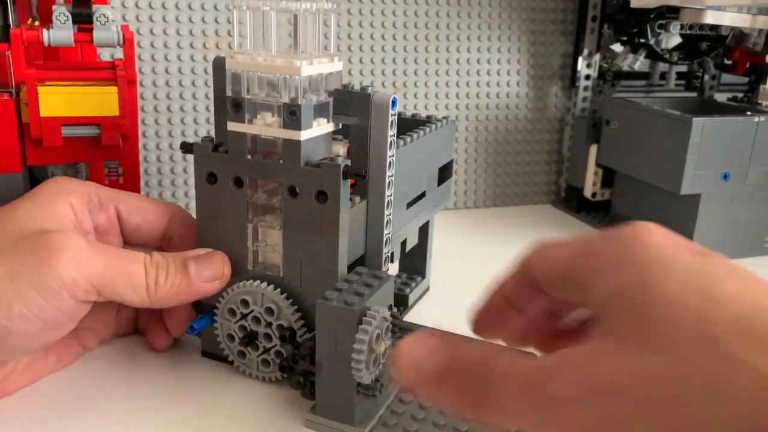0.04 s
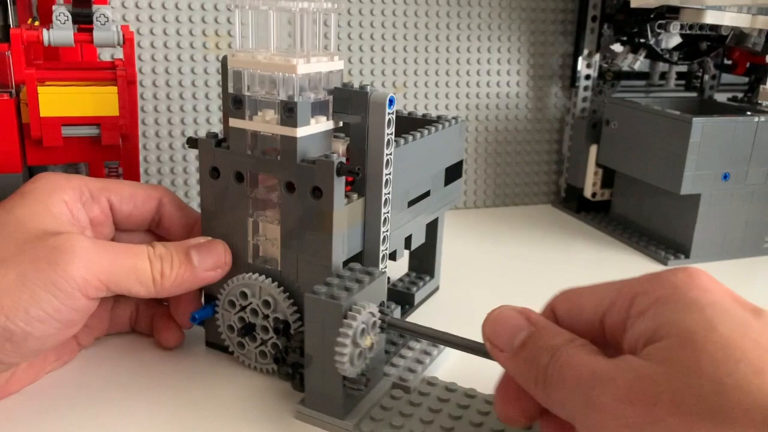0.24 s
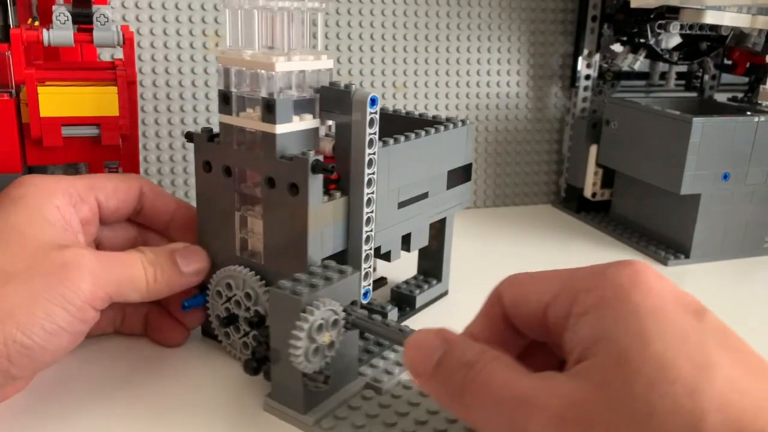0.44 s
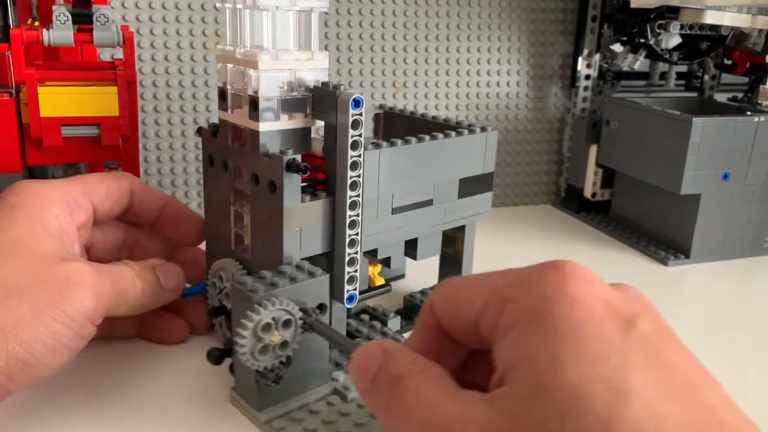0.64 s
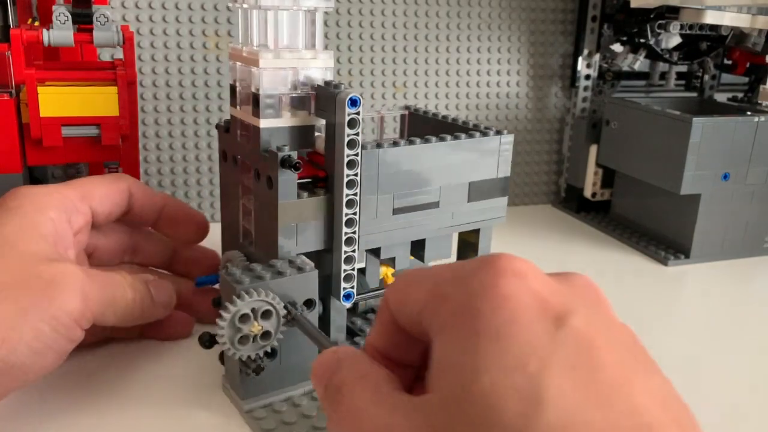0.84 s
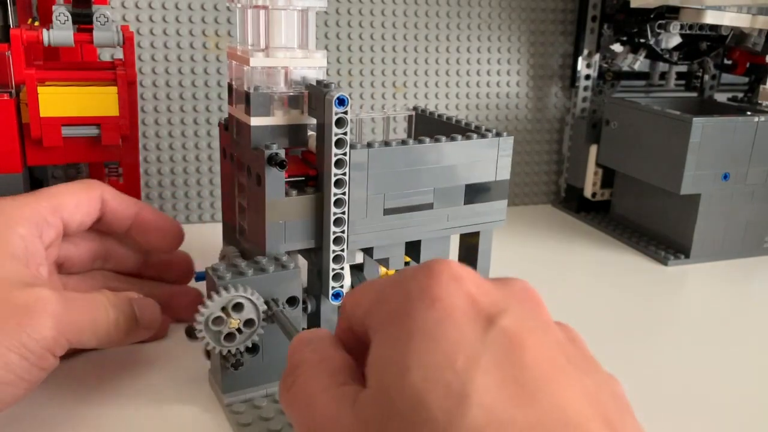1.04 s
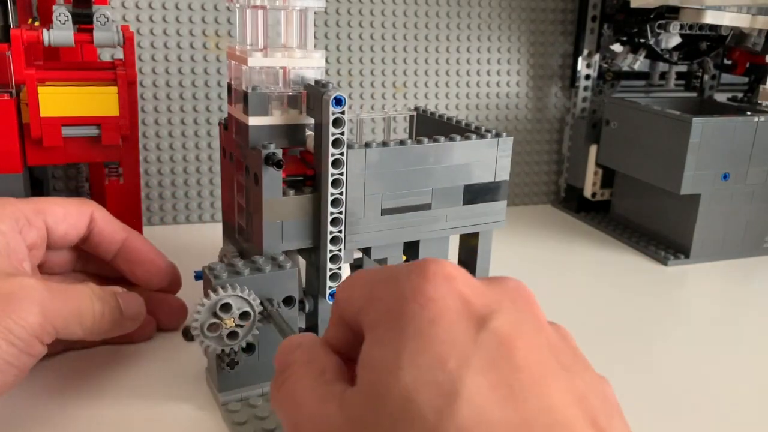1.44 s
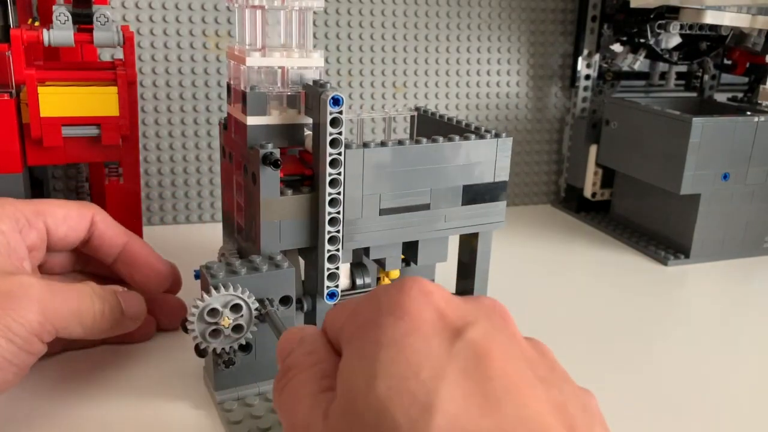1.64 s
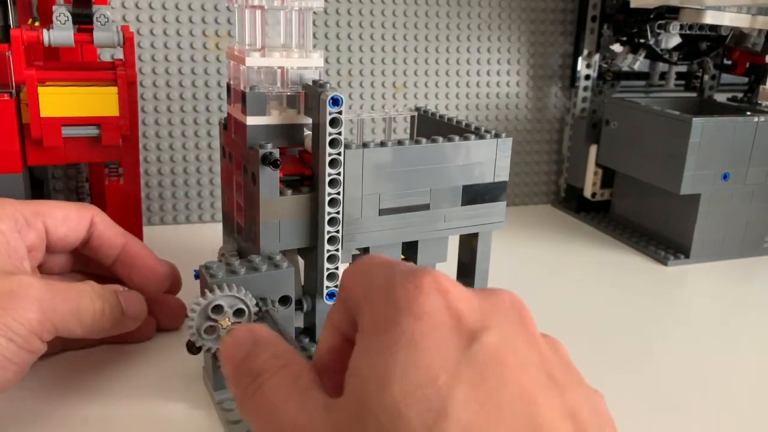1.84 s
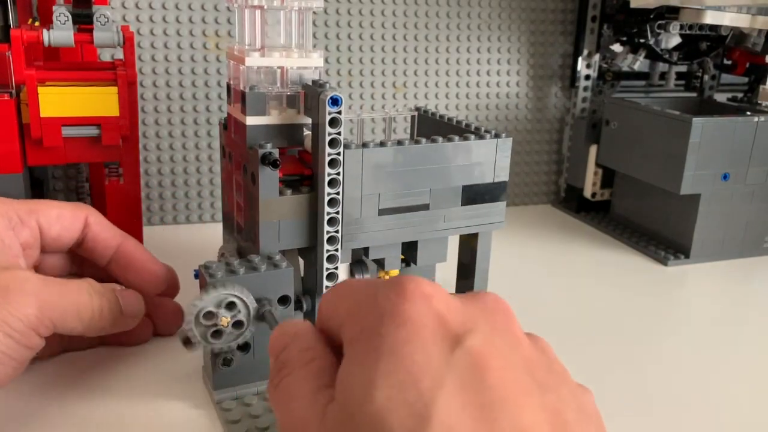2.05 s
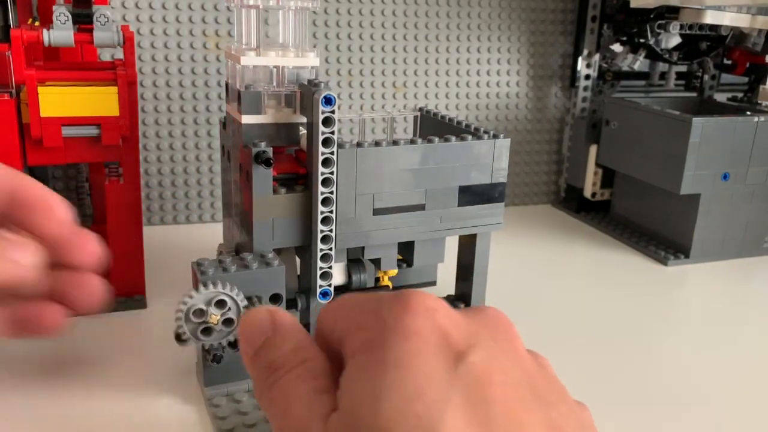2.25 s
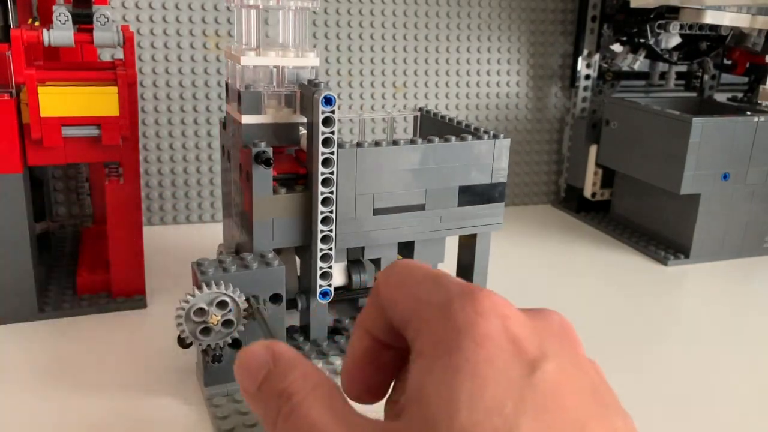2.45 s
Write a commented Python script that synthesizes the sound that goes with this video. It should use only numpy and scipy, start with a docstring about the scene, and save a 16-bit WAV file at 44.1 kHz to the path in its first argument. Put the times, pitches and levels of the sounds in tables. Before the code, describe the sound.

A plastic toy machine scrapes over a table with a low groan and soft bumps. Then its loose gears rub and click unevenly as a hand cranks them, heard close in a small quiet room.

```python
"""A scrape and a low groan: hands swing a plastic brick machine round on a table, then crank its axle.
The base slides in tiny slips, hisses and squeaks once; it rocks and the hands thud on the tabletop.
Loose gear teeth rub, catch and click, ringing the hollow frame.
The base shifts once more as one hand lets go. Heard close by in a small quiet room."""
import sys
import numpy as np
from scipy import signal
from scipy.fft import rfft, irfft, next_fast_len
from scipy.io import wavfile
from scipy.ndimage import map_coordinates

SR = 44100
rng = np.random.default_rng(int(sys.argv[2]) if len(sys.argv) > 2 else 0)


def transcribe(u):
    """Save the signal u as a 16-bit wav file named by the first command-line argument.

    u: samples, shape (n,) or (channels, n), limited to [-1, 1]; the rate is SR.
    q: integer samples, one column per channel.
    """
    v = np.clip(np.atleast_2d(u).T, -1, 1)
    q = np.round(v * 32767).astype(np.int16)
    wavfile.write(sys.argv[1], SR, q)


N = 114660

# friction envelopes of the sliding base: time_s, relative_db
SCRAPE_LEVELS = [(0, -73), (.08, -64.5), (.19, -71), (.24, -56), (.38, -51), (.42, -44.5), (.475, -54.5),
                 (.495, -42.5), (.54, -37.5), (.57, -47), (.62, -41.5), (.72, -54), (.79, -57), (.89, -53),
                 (.94, -50), (1.005, -47.5), (1.045, -65.5), (1.15, -63), (1.25, -76.5), (2.1, -67),
                 (2.15, -59.5), (2.22, -65.5), (2.25, -65)]
GROAN_LEVELS = [(0, -66.5), (.17, -54.5), (.33, -43.5), (.44, -34.5), (.485, -44.5), (.52, -38.5),
                (.65, -38.5), (.735, -48.5), (.84, -43.5), (1.0, -42), (1.04, -51.5), (1.17, -54),
                (1.26, -60.5)]
HISS_LEVELS = [(0, -72.5), (.24, -78), (.43, -64), (.475, -73), (.52, -53.5), (.57, -61), (.62, -56),
               (.78, -71.5), (1.0, -66.5), (1.08, -73), (1.26, -86.5), (2.04, -78.5), (2.09, -59),
               (2.19, -70.5), (2.26, -84)]
# base resonances: centre_hz, width_hz, lift_db
BASE_RESONANCES = [(240.2, 68, 7), (435.4, 18, 11), (959, 168, 12.5), (1186, 50, 8), (1594, 110, 9.5),
                   (2028, 140, 8.5), (3050, 600, 5.5)]
# base bumps, hand thuds: start_s, relative_db
BASE_BUMPS = [(0.21, -30), (0.406, -30), (0.54, -27.5), (.642, -29), (1.07, -27), (1.518, -31),
              (1.592, -31), (1.662, -34.5), (1.873, -30), (2.093, -25.5), (2.211, -35), (2.274, -30.5)]
HAND_THUDS = [(0.08, -35), (.642, -33.5), (1.07, -36), (1.3, -41), (1.475, -39.5), (2.13, -35.5),
              (2.36, -45)]
# teeth and axles catching: start_s, clack_relative_db, tick_relative_db, pitch_hz
GEAR_CATCHES = [(0.196, -36, -66, 947), (0.205, -38.5, -60, 986), (0.229, -58, -84, 3370),
                (0.872, -47.5, -76, 2440), (0.961, -51, -65, 1850), (0.97, -47, -61, 3300),
                (1.0, -40.5, -57.5, 1910), (1.123, -39.5, -47, 2480), (1.297, -36.5, -64.5, 1040),
                (1.334, -40.5, -44.5, 2550), (1.42, -48, -68.5, 1640), (1.464, -41, -44.5, 3490),
                (1.471, -29.5, -51, 2437), (1.502, -44, -62, 1610), (1.547, -49, -86, 1070),
                (1.581, -46, -55.5, 2420), (1.588, -37, -69, 2340), (1.634, -38.5, -58.5, 1120),
                (1.640, -31, -43, 2420), (1.646, -33, -50.5, 3140), (1.671, -40, -61, 3320),
                (1.763, -54, -84, 2360), (1.79, -44.5, -71.5, 1010), (1.829, -38, -50, 1580),
                (1.876, -44.5, -54.5, 2520), (1.949, -47, -77, 1580), (1.998, -33, -60, 2780),
                (2.002, -37, -60, 886), (2.073, -39, -40.5, 2550), (2.089, -35, -53, 1510),
                (2.276, -45, -61.5, 1590), (2.3, -43.5, -53.5, 2330)]
# pushes on the crank: start_s, length_s, relative_db
CRANK_PUSHES = [(1.13, 0.03, -49), (1.29, 0.046, -48.5), (1.309, 0.034, -43), (1.408, 0.06, -54),
                (1.45, 0.047, -46.5), (1.537, 0.08, -58), (1.625, 0.029, -44.5), (1.783, 0.077, -50),
                (1.814, 0.069, -47), (1.985, 0.03, -45), (2.03, 0.076, -56.5), (2.068, 0.034, -41.5),
                (2.106, 0.029, -57), (2.261, 0.049, -44)]
# body modes: pitch_hz, relative_db, t60_s
BASE_MODES = [(238.7, -11, 0.1), (273.2, -6, 0.088)]
TABLE_MODES = [(90, -13, 0.24), (130, -5.5, 0.1)]
FRAME_MODES = [(920, -8, 0.097), (1153, 1.5, 0.027), (1560, -9.5, 0.015), (2430, -12.5, 0.024),
               (3390, 2, 0.031)]
# noise spectra: freq_hz, relative_db
SCRAPE_SPECTRUM = [(200, -25.5), (400, 0), (600, -1.5), (1000, -5), (1450, -6), (2100, -5), (2500, -9),
                   (5000, -15.5), (8000, -39), (14000, -79)]
GROAN_SPECTRUM = [(30, -60), (70, -20), (128, -6.5), (180, -16.5), (225, -3), (265, -0.5), (340, -11),
                  (440, -14), (560, -27.5), (1200, -64.5)]
HISS_SPECTRUM = [(1500, -23), (4000, 13.5), (7000, 13), (9300, 13.5), (10600, -6.5), (13500, 11.5),
                 (14600, -18), (16000, -34)]
TICK_SPECTRUM = [(1500, -16.5), (4000, 2), (6500, -1.5), (8300, 5.5), (10500, -7), (13000, -7.5),
                 (16000, -32)]
CLACK_SPECTRUM = [(200, -30.5), (700, -8), (1300, -1.5), (2500, 5.5), (3800, -2), (5200, -7.5), (9000, -12),
                  (15000, -44.5)]
GRIND_SPECTRUM = [(150, -14), (400, -1), (1000, 2), (1350, -1.5), (2400, 3), (3400, -4), (5000, -14),
                  (8500, -19), (16000, -40.5)]
AIR_SPECTRUM = [(25, 7), (90, 10.5), (280, -10), (600, -19), (1200, -28.5), (13500, -36.5), (15500, -70)]
# left-right likeness: freq_hz, coherence
STEREO_COHERENCE = [(380, 1), (600, 0.88), (1000, 0.7), (2500, 0.2), (5000, 0.1), (12000, 0.4)]
# balance: freq_hz, left_minus_right_db
STEREO_BALANCE = [(300, .3), (640, -0.8), (1100, -3.8), (2400, -2), (4500, 1.3), (13000, 1)]
# room decay: freq_hz, t60_s
ROOM_DECAY = [(150, 0.68), (1000, 0.15), (4000, 0.25), (12000, 0.14)]

TOP_HZ = 16000
TIME_S = np.arange(N) / SR
FFT_SIZE = 2 * next_fast_len(N)
BINS_HZ = np.fft.rfftfreq(FFT_SIZE, 1 / SR)


def amp(db):
    return 10 ** (np.asarray(db) / 20)


def unit_rms(x):
    return x / np.sqrt(np.mean(x ** 2) + 1e-20)


def log_interp(points, hz):
    knots_hz, values = np.transpose(points)
    return np.interp(np.log(hz + 1), np.log(knots_hz + 1), values)


def envelope(levels, release_db_per_s=178):
    """Gain through the points, dying away after the last."""
    overrun_s = np.maximum(TIME_S - levels[-1][0], 0)
    return amp(np.interp(TIME_S, *np.transpose(levels)) - release_db_per_s * overrun_s)


def wobble(rate_hz):
    """Smooth random curve."""
    knots = rng.standard_normal(int(N * rate_hz / SR) + 4)
    return map_coordinates(knots, [TIME_S * rate_hz])


def add(track, start_s, sound):
    part = track[max(round(start_s * SR), 0):][:len(sound)]
    part += sound[:len(part)]


def colour(x, spectrum, peaks=()):
    """Minimum-phase filter of unit power: broad spectrum plus resonances."""
    lift_db = sum(db / (1 + (2 * (BINS_HZ - hz) / width_hz) ** 2) for hz, width_hz, db in peaks)
    gain = unit_rms(amp(log_interp(spectrum, BINS_HZ) + lift_db))
    cepstrum = irfft(np.log(gain + 1e-6))
    cepstrum[1:FFT_SIZE // 2] *= 2
    cepstrum[FFT_SIZE // 2 + 1:] = 0
    return irfft(rfft(x, FFT_SIZE) * np.exp(rfft(cepstrum)), FFT_SIZE)[..., :N]


def slips(rate_hz, spread_db, rush):
    """Friction: tiny slips of random size over a smooth rush."""
    hits = rng.random(N) < rate_hz / SR
    sizes = amp(spread_db * np.clip(rng.standard_normal(N), -2, 2)) * rng.choice([-1, 1], N)
    return unit_rms(unit_rms(hits * sizes) + rush * rng.standard_normal(N))


def ring(modes, t):
    """Damped modes, varied per strike."""
    out = np.zeros(len(t))
    for hz, db, t60_s in modes:
        decay = amp(db + 2.5 * rng.normal() - 60 * t / t60_s)
        detune = 1 + .013 * rng.normal()
        out += decay * np.sin(2 * np.pi * hz * detune * t) * rng.choice([-1, 1])
    return out


def base_slide(drift=.025, judder_db=2):
    """The base judders over the table, which groans under it; plastic and skin hiss."""
    scrape = colour(slips(rate_hz=1200, spread_db=-1.5, rush=.43), SCRAPE_SPECTRUM, BASE_RESONANCES)
    read_at = np.cumsum(1 + drift * wobble(5))  # resonances wander as the base turns
    scrape = unit_rms(map_coordinates(scrape, [read_at], mode="mirror"))
    scrape *= envelope(SCRAPE_LEVELS) * amp(judder_db * wobble(90))
    groan = colour(slips(rate_hz=400, spread_db=2.5, rush=.41), GROAN_SPECTRUM, BASE_RESONANCES)
    groan = unit_rms(groan) * envelope(GROAN_LEVELS)
    hiss = unit_rms(colour(rng.standard_normal(N), HISS_SPECTRUM)) * envelope(HISS_LEVELS)
    return amp(.44) * scrape + amp(-1.27) * groan + amp(2.5) * hiss


def room_air():
    """Steady low noise, nearly alike on both sides."""
    noise = rng.standard_normal(N) + .19 * rng.standard_normal((2, N))
    return unit_rms(colour(noise, AIR_SPECTRUM))


def table_knocks(attack_s=.0011):
    """Soft contacts ring the hollow base and the tabletop, too light for deep bass."""
    t = np.arange(SR // 3) / SR
    onset = 1 - np.exp(-t / attack_s)
    out = np.zeros(N)
    for contacts, modes in (BASE_BUMPS, BASE_MODES), (HAND_THUDS, TABLE_MODES):
        for start_s, db in contacts:
            add(out, start_s, amp(db) * ring(modes, t) * onset)
    return signal.sosfilt(signal.butter(2, 80, "high", fs=SR, output="sos"), out)


def gear_clicks(part_db=7.5, part_t60_s=.03):
    """A tooth snaps over: a sharp tick and a clack, ringing its own part and the frame."""
    t = np.arange(SR // 8) / SR
    ticks, clacks, rings = np.zeros((3, N))
    for start_s, clack_db, tick_db, pitch_hz in GEAR_CATCHES:
        lowpass = signal.butter(2, min(2.3 * pitch_hz, TOP_HZ), fs=SR)  # lower parts clack duller
        burst = amp(clack_db - 60 * t / .043) * (1 - np.exp(-t / .00021)) * rng.standard_normal(len(t))
        modes = [(pitch_hz, part_db, part_t60_s)] + FRAME_MODES
        ringing = amp(clack_db) * ring(modes, t) * (1 - np.exp(-t / .0014))
        add(ticks, start_s, amp(tick_db - 60 * t / .022) * rng.standard_normal(len(t)))
        add(clacks, start_s, signal.lfilter(*lowpass, burst))
        add(rings, start_s, signal.lfilter(*lowpass, ringing))
    snaps = amp(4.5) * colour(ticks, TICK_SPECTRUM) + amp(-2) * colour(clacks, CLACK_SPECTRUM)
    return snaps + amp(-8.5) * rings


def base_squeak(start_s=.745, length_s=.15, from_hz=14200, to_hz=12400):
    """One corner of the base whistles, falling as it slows."""
    progress = np.clip((TIME_S - start_s) / length_s, 0, 1)
    glide_hz = from_hz + (to_hz - from_hz) * np.sqrt(progress)
    pitch_hz = glide_hz * (1 + .02 * wobble(700))
    swell = np.sqrt(np.abs(np.sin(np.pi * progress)))
    return swell * np.sin(2 * np.pi * np.cumsum(pitch_hz) / SR)


def gear_rub(attack_s=.015, t60_s=.11):
    """Each push on the crank drags tooth over tooth, shaking frame and table."""
    power = np.zeros(N)
    for start_s, length_s, db in CRANK_PUSHES:
        onset = np.clip((TIME_S - start_s) / attack_s, 0, 1)
        overrun_s = np.maximum(TIME_S - start_s - length_s, 0)
        power += (onset * amp(db - 60 * overrun_s / t60_s)) ** 2
    push = np.sqrt(power)
    grind = push * slips(rate_hz=650, spread_db=-.5, rush=.6)
    grind = colour(grind, GRIND_SPECTRUM, peaks=[(hz, 100, 3.5) for hz, _, _ in FRAME_MODES])
    shake = np.sqrt(push) * slips(rate_hz=460, spread_db=-.5, rush=.54)
    shake = colour(shake, GROAN_SPECTRUM, peaks=[(92.6, 13, 10)])
    return amp(-2) * grind + amp(-25) * shake


def place(x, left_lag_s, scatter_t60_s=.017):
    """Mono to stereo: scatter, balance, delay."""
    t = np.arange(SR // 20) / SR
    scatter = rng.standard_normal(len(t)) * amp(-60 * t / scatter_t60_s)
    scatter /= np.linalg.norm(scatter)
    angle_rad = np.arccos(np.clip(log_interp(STEREO_COHERENCE, BINS_HZ), 0, 1)) / 2
    side = np.array([[1], [-1]])
    spread = np.cos(angle_rad) + side * np.sin(angle_rad) * rfft(scatter, FFT_SIZE)
    balance = amp(side * log_interp(STEREO_BALANCE, BINS_HZ) / 2)
    delay = np.exp(-1j * np.pi * side * BINS_HZ * left_lag_s)
    return irfft(rfft(x, FFT_SIZE) * spread * balance * delay, FFT_SIZE)[:, :N]


def room_reverb(x):
    """Short room tail, mono in the bass."""
    hz, t, noise = signal.stft(rng.standard_normal((2, SR // 2)), SR, nperseg=256)
    decay = amp(-60 * t / log_interp(ROOM_DECAY, hz)[:, None])
    tail = signal.istft(noise * decay, SR, nperseg=256)[1]
    tail = np.pad(tail / np.linalg.norm(tail[0]), ((0, 0), (SR // 200, 0)))  # 5 ms predelay
    width = signal.sosfilt(signal.butter(2, 600, "high", fs=SR, output="sos"), tail[0] - tail[1])
    tail = tail.mean(0) + np.array([[.5], [-.5]]) * width
    return signal.fftconvolve(x[None], tail, axes=1)[:, :N]


def scene():
    """Sliding, rubbing and impacts in the room, over faint air."""
    sliding = base_slide() + amp(-68) * base_squeak()
    rubbing = gear_rub()
    impacts = gear_clicks() + table_knocks()
    air = room_air()
    direct = place(sliding, left_lag_s=9e-5)
    direct += place(rubbing, left_lag_s=7e-5) + place(impacts, left_lag_s=7e-5)
    return direct + amp(-14.5) * room_reverb(sliding + rubbing + impacts) + amp(-64) * air


def record(dry):
    """Brick-wall low-pass at TOP_HZ."""
    return irfft(rfft(dry, FFT_SIZE) * (BINS_HZ < TOP_HZ), FFT_SIZE)[:, :N]


dry = scene()
out = record(dry)
transcribe(out)
```